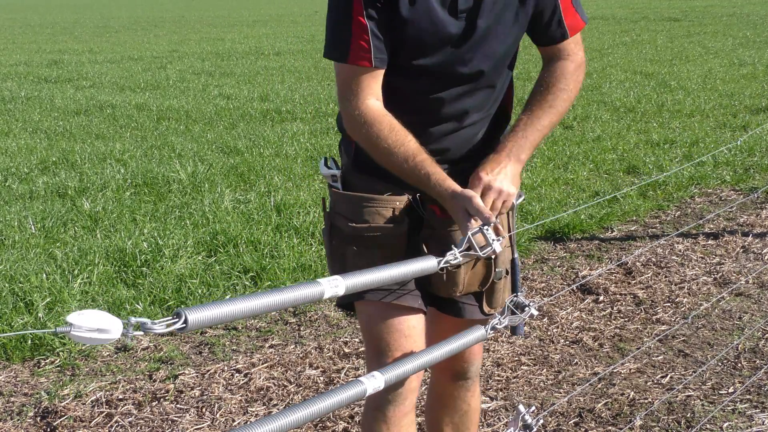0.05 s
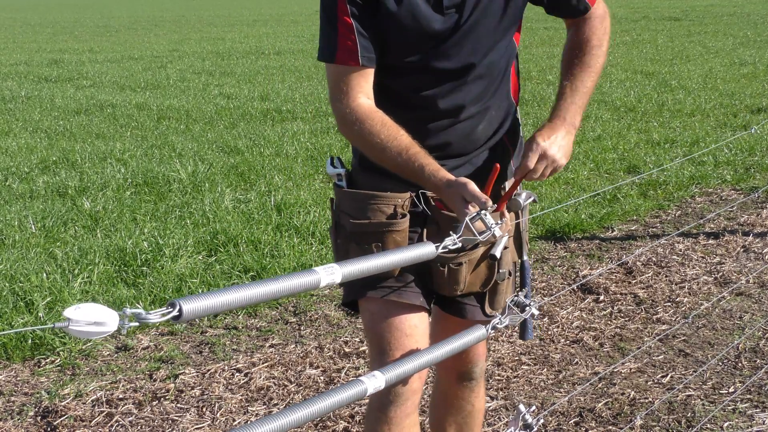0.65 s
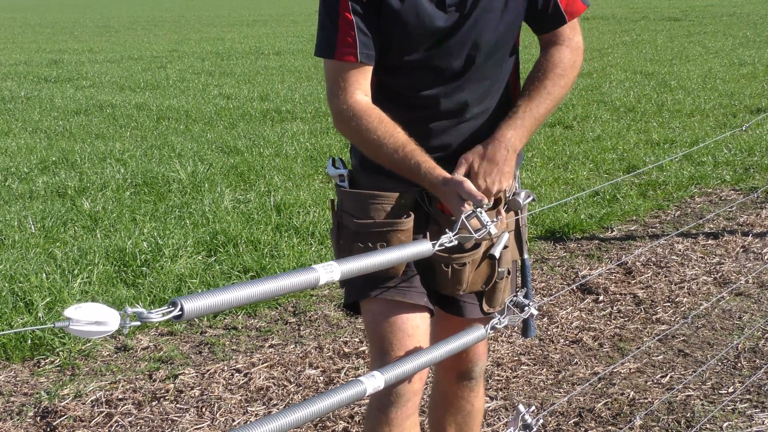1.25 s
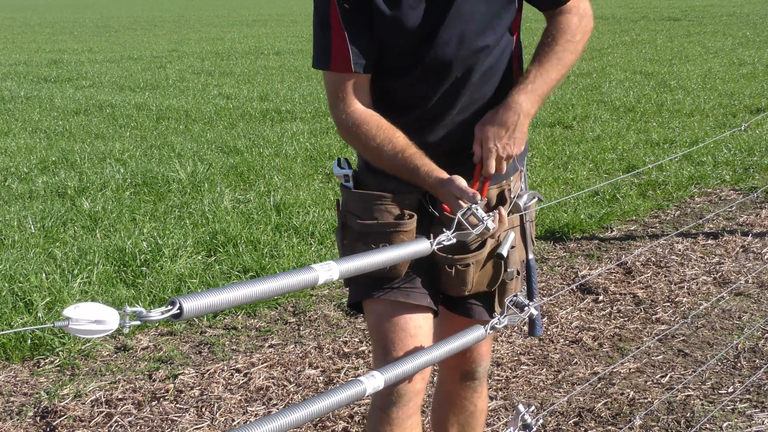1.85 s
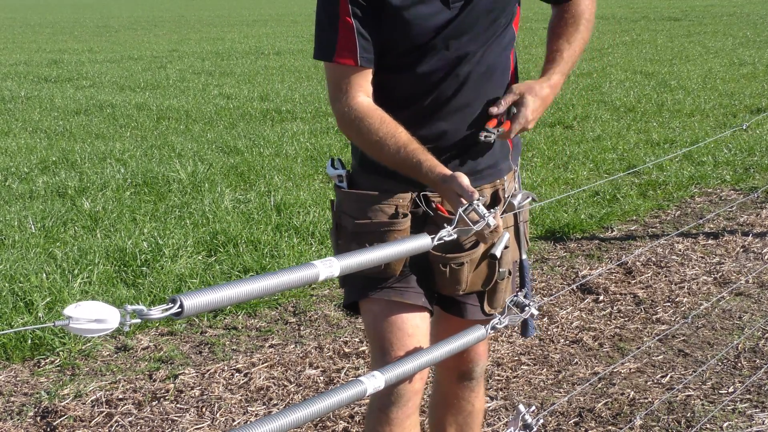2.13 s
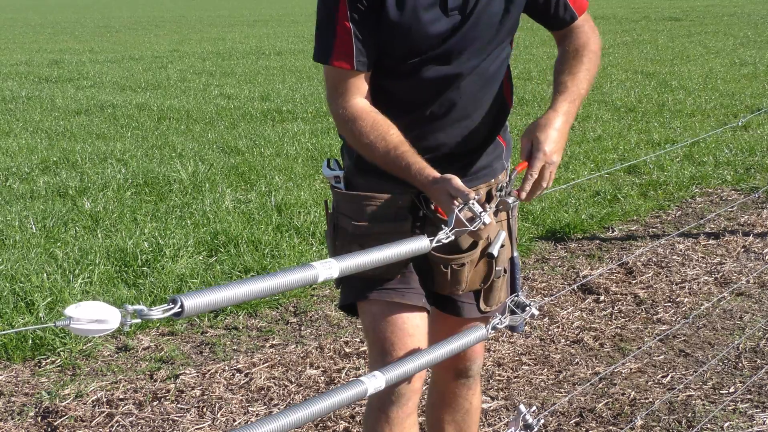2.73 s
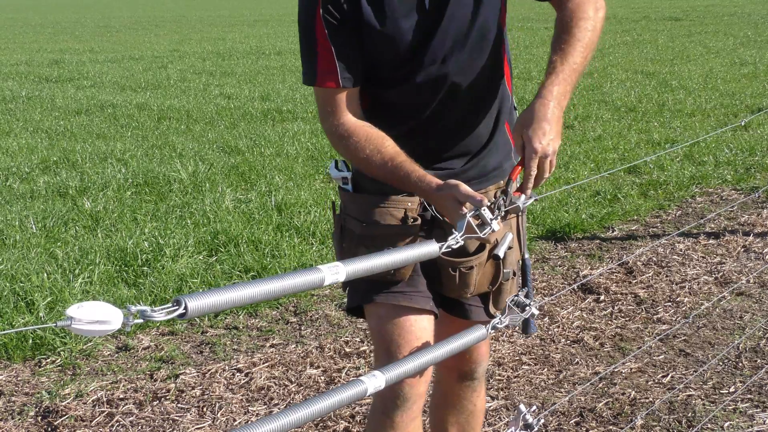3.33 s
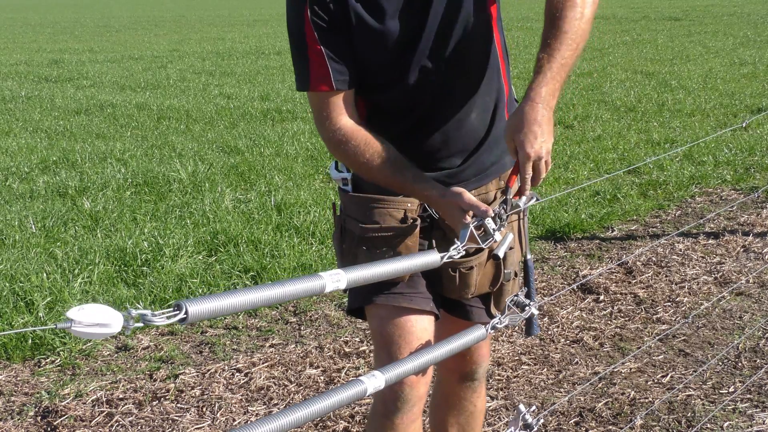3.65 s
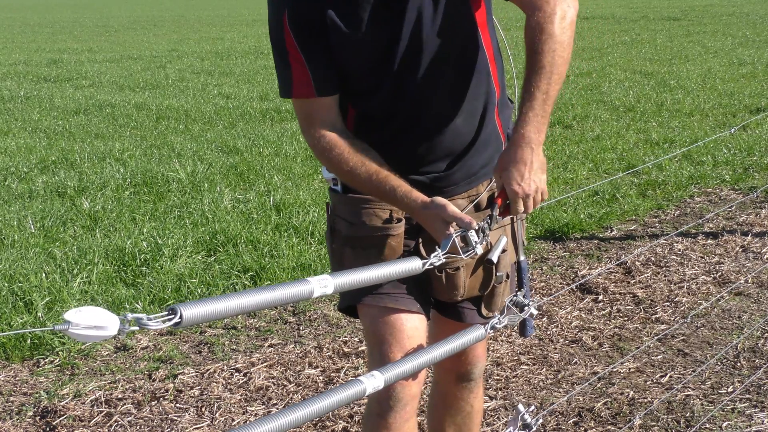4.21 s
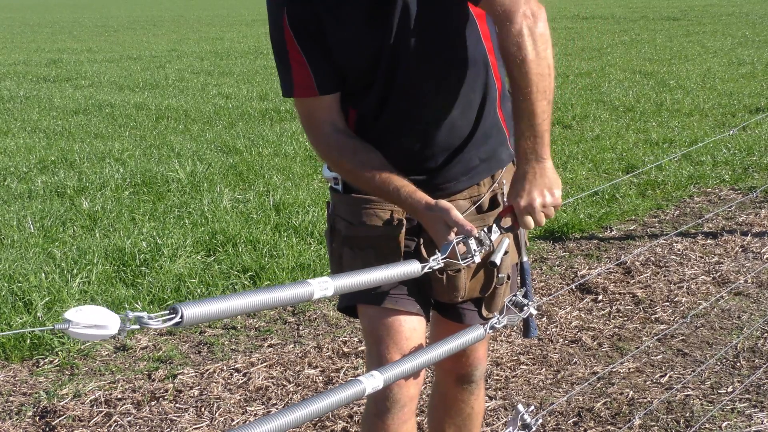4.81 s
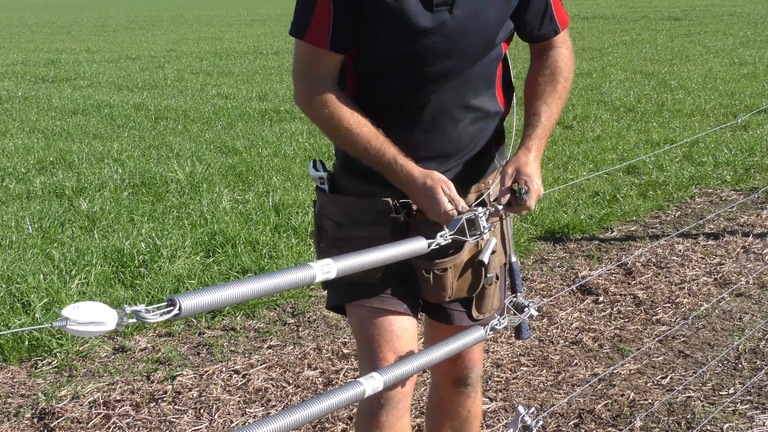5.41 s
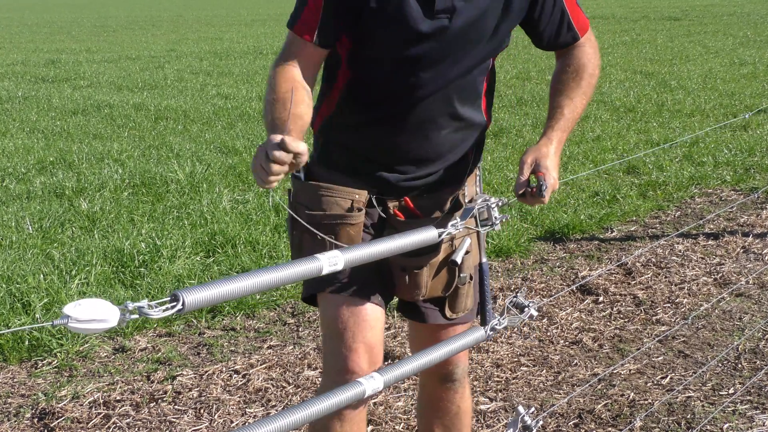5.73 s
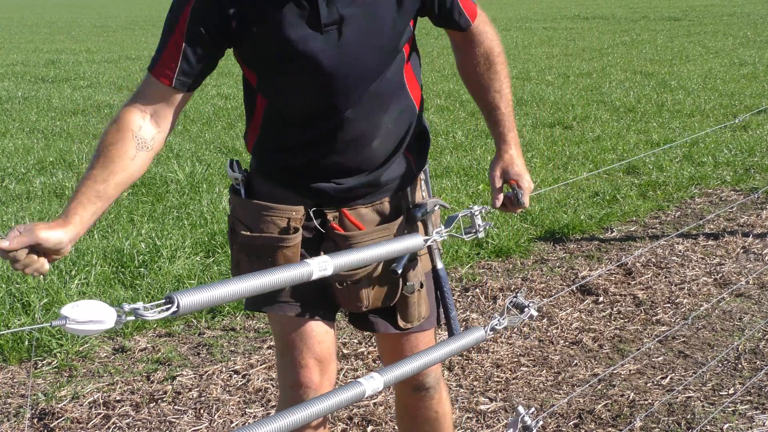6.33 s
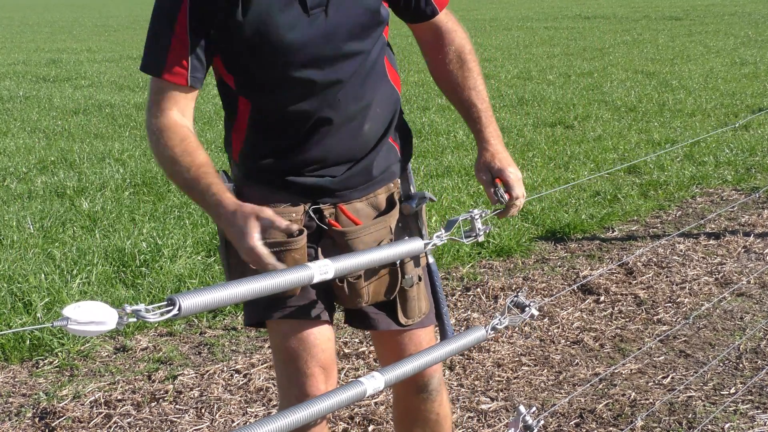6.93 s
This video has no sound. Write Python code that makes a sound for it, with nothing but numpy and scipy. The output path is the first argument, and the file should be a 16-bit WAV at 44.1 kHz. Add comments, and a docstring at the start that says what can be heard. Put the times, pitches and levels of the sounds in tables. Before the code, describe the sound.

Someone handles wire fittings outdoors with small clicks and dull thumps, then snips the wire with a sharp crack as a distant bird sings.

```python
"""Small ticks and knocks of pliers on fence fittings, a few steps from the microphone in an open paddock. A
hand rummages in a leather pouch and dull thumps come from the work at the strainer. Then the pliers bite
through the wire with one loud snap, the end springs free and is drawn out, and something drops into the pouch.
Each blow is a brief chatter of contacts ringing the thing struck; rubs and scrapes are uneven noise. Behind it
all a distant skylark whistles, over a low breeze and the hiss of open air."""
import sys
import numpy as np
from scipy import signal
from scipy.fft import rfft, irfft
from scipy.io import wavfile
from scipy.ndimage import uniform_filter1d

SR = 44100
rng = np.random.default_rng(int(sys.argv[2]) if len(sys.argv) > 2 else 0)


def unload_wav(signal):
    """Save mono or channel-first audio to the path in sys.argv[1] as 16-bit WAV at rate SR, clipped to [-1, 1]."""
    wavfile.write(
        sys.argv[1],
        SR,
        np.round(np.clip(np.atleast_2d(signal).T, -1, 1) * 32767).astype(np.int16),
    )


N = 311766

# The cut, a few steps ahead. Blows: (time [s], level [dB], tilt [dB/octave], chatter [s], t60 [s])
CUT_BLOWS = [(4.7658, -38, -0.5, .003, 0.014), (4.7687, -17.5, 3.5, 0.00052, 0.011),
             (4.7695, -12, 0.5, .0032, 0.014), (4.782, -35.5, -2, .004, 0.047),
             (4.7925, -40, -2.5, .002, 0.067), (4.808, -42.5, -0.5, .016, 0.084)]
# Its body. Every colour: (frequency [Hz], gain [dB]); all modes: (frequency [Hz], width [Hz], lift [dB])
CUT_COLOUR = [(71, -50.5), (120, -16.5), (378, -6), (1160, -13.5), (1750, -6.5), (2200, -14), (2530, -5),
              (3240, -8), (3590, -11), (4500, -6), (6910, -10), (7500, -12), (13000, -14), (16000, -19)]
CUT_MODES = [(384, 110, 8), (1330, 120, 5), (1778, 130, 10), (2455, 130, 9), (2600, 120, 5),
             (3608, 130, 10), (3928, 90, 4), (4230, 70, 4), (4423, 180, 7), (4615, 90, 4), (4839, 100, 5),
             (5772, 110, 4), (6515, 100, 5), (7555, 90, 10), (8141, 80, 6), (9463, 70, 7), (9592, 55, 12),
             (9763, 60, 8), (10600, 70, 5), (12100, 90, 5)]
def wire_snap():
    """The jaws bite through the wire in one loud crack."""
    return blows(CUT_BLOWS, CUT_COLOUR, CUT_MODES, trail_db=-31, trail_t60=.33)


# The freed end at the strainer: blows, colour and modes, columns as for the cut
SPRING_BLOWS = [(5.4102, -31.5, 0.75, .003, 0.027), (5.4140, -30.5, 1, 0.00158, 0.019),
                (5.422, -40.5, -2.2, 0.0012, 0.041)]
WIRE_COLOUR = [(120, -26), (200, -14.5), (432, -4), (791, -15), (1040, -3.5), (1710, -16), (2420, -20),
               (2750, -19), (5520, -16.5), (8270, -8), (12400, -10), (14900, -10), (16000, -7)]
WIRE_MODES = [(430, 61, 12), (1020, 65, 5), (5950, 71, 8.7), (6900, 33, 4.2), (7700, 150, 15.6),
              (8260, 51, 18), (8858, 66, 7.1), (9800, 82, 17), (11600, 50, 12), (14400, 35, 8),
              (14874, 50, 11), (15135, 28, 14)]
def wire_spring():
    """The cut end springs free with a bright clink."""
    return blows(SPRING_BLOWS, WIRE_COLOUR, WIRE_MODES, trail_db=-16.5, trail_t60=.11)


# The leather tool pouch: blows, colour and modes, columns as for the cut
POUCH_BLOWS = [(6.9998, -27, 0, 0.0036, 0.027), (7.0035, -25.5, -0.5, 0.0035, 0.057),
               (7.0155, -35, 3.5, 0.0024, 0.088), (7.040, -38, 11, 0.012, 0.068),
               (7.0515, -38, 4.5, 0.0044, 0.053), (7.058, -30.5, 6, 0.017, 0.12)]
POUCH_COLOUR = [(71, -58), (120, -30), (402, -17), (712, -6.5), (988, -10), (1790, -12), (1980, -15.5),
                (2930, -17), (3380, -15), (4500, -19), (6770, -25.5), (13600, -30.5), (16000, -36)]
POUCH_MODES = [(640, 49, 5.4), (736, 83, 7.8), (1113, 36, 6.5), (1406, 61, 6.4), (1750, 65, 4.9),
               (4370, 260, 3.8)]
def pouch_drop():
    """Something drops into the leather pouch, with a softer onset than the snap."""
    return blows(POUCH_BLOWS, POUCH_COLOUR, POUCH_MODES, trail_db=-14.5, trail_t60=.2, rise_s=.00047)


# Hook, pliers and clamp at the strainer: blows, colour and modes of each, columns as for the cut
HOOK_BLOWS = [(.4775, -38, 0.52, 0.0022, .024), (.511, -51.5, -2, 0.0082, 0.046)]
HOOK_COLOUR = [(120, -40), (200, -5), (749, -3), (1980, -17), (2700, -5), (3690, -21), (4600, -3),
               (5040, -27), (6050, -22), (14600, -53), (16000, -56)]
HOOK_MODES = [(668, 19, 14), (2695, 57, 17), (3350, 63, 20), (4580, 190, 9.4)]
PLIERS_BLOWS = [(.578, -46.5, -1.7, 0.002, 0.027), (1.0498, -33.5, 0.19, 0.0034, .028),
                (1.067, -39, -1.2, 0.0099, 0.037), (1.096, -38.5, 1, 0.0092, 0.026)]
PLIERS_COLOUR = [(88, -49), (150, -10.5), (414, -2.5), (555, -21), (662, -2.5), (923, -10), (1660, -8.5),
                 (1900, -14), (2700, -2.5), (3040, -14.5), (4410, -3), (5050, -8), (16000, -32)]
PLIERS_MODES = [(433, 24, 17), (690, 63, 5.5), (1560, 150, 3.6), (2790, 28, 17.4), (3260, 37, 14),
                (3940, 65, 9.6), (4300, 44, 8.3), (4490, 77, 12), (5540, 80, 16), (7160, 60, 16)]
CLAMP_BLOWS = [(.5459, -32.5, 0, .0015, .035), (.590, -47, 2, .005, .05)]
CLAMP_COLOUR = [(120, -40), (200, -14), (548, -18), (851, -6), (1000, -14.5), (1840, -14), (2380, -11),
                (2960, -17.5), (4520, -21), (16000, -40)]
CLAMP_MODES = [(423, 9.5, 24), (860, 13, 13), (2380, 40, 22), (4510, 68, 20), (5960, 60, 19),
               (6643, 54, 9.5), (8100, 45, 17)]
def tool_clinks():
    """Metal strikes metal, and each piece rings with its own modes."""
    return (blows(HOOK_BLOWS, HOOK_COLOUR, HOOK_MODES, trail_db=-11, trail_t60=.14)
            + blows(PLIERS_BLOWS, PLIERS_COLOUR, PLIERS_MODES, trail_db=-10, trail_t60=.2)
            + blows(CLAMP_BLOWS, CLAMP_COLOUR, CLAMP_MODES, trail_db=-9, trail_t60=.1))


# Knocks at the fence: (time [s], level [dB], tilt [dB/octave], chatter [s]); their colour and modes
KNOCKS = [(.676, -54.5, 2.5, .003), (1.212, -57.5, 3, 0.002), (1.524, -56, -1.5, .005),
          (1.435, -58, -9, .004), (1.572, -60, -1.5, .004), (1.624, -58, -4.5, 0.0035),
          (1.657, -61, -2.5, .003), (2.46, -58, -13, .008), (2.923, -50, 5, 0.0016),
          (3.9668, -41.5, 4, 0.0026), (3.9861, -39.5, 3, 0.00067), (4.001, -46, .5, .003),
          (5.153, -54.5, 2.5, .004), (5.361, -59, -6, 0.0054), (6.524, -54, -7, .006)]
KNOCK_COLOUR = [(88, -42), (150, -17), (422, -3), (589, -6), (1210, -4.5), (1660, -9), (1790, -7.5),
                (2920, -20), (4160, -20.5), (14800, -37.5), (16000, -47)]
KNOCK_MODES = [(463, 39, 11), (990, 120, 2.8), (1820, 46, 2.7), (4160, 160, 1.8), (7950, 140, 7.9),
               (8200, 130, 5.7)]
def knocks(t60=.035):
    """Tools and fittings knock lightly, all dying away at the same speed."""
    return blows([(*row, t60) for row in KNOCKS], KNOCK_COLOUR, KNOCK_MODES, trail_db=-8, trail_t60=.11)


# The clearer ticks: (time [s], relative level [dB], tilt [dB/octave]); their colour and modes
TICKS = [(0.012, -39, -0.5), (.183, -50, 1.5), (0.204, -42.5, -1), (0.3144, -36, 1), (.41, -47.5, -1),
         (.3484, -49.5, -4.5), (.488, -43, -4), (0.5836, -40.5, 2), (.632, -43.5, .5), (.819, -40.5, 0.5),
         (.877, -44.5, -2), (1.0116, -45.5, -1.5), (1.1194, -42.5, 2), (1.3449, -46.5, -1),
         (1.6536, -48.5, -2), (1.695, -49, -1.5), (1.7773, -47.5, -1), (2.0185, -50, -3.5),
         (2.1714, -47, 0.5), (2.361, -48, -2), (2.749, -50.5, 0.5), (2.6092, -47, 0), (2.842, -48.5, 0),
         (2.9233, -41, -5), (3.1452, -43.5, -0.5), (3.4194, -46, -1), (3.6535, -46, 1.5), (3.6875, -48, 1),
         (4.12, -46.5, -2), (4.228, -45, 0), (4.253, -43, 0), (4.358, -45.5, 0), (4.431, -45.5, .5),
         (4.8635, -36, .5), (4.8894, -42.5, 2), (4.9713, -43, -1.5), (5.0684, -42.5, -2), (5.363, -45, 2),
         (5.798, -46.5, -5.5)]
TICK_COLOUR = [(300, -45.5), (1000, -8), (2200, -0.5), (4000, 5), (5800, 5.5), (9000, -2.5), (12000, -1),
               (16000, 2)]
TICK_MODES = [(2243, 24, 8.6), (3970, 19, 7.8), (4370, 60, 3.1), (5870, 36, 9.8), (6270, 52, 5.7),
              (7730, 36, 12), (8500, 104, 10.3), (9080, 70, 6.5), (10000, 100, 6.3), (11270, 150, 9.6),
              (14200, 77, 4.5), (15550, 62, 2.7)]
def ticks(gain_db=-9, faint_db=-52, let_go_s=5.5, chatter_s=.0055, faint_t60=.06, t60_per_db=.0022):
    """Wire and fittings tick, harder ones ringing longer; faint ones fall at random until the hands let go."""
    faint = [(s, faint_db, -1) for s in rng.uniform(0, let_go_s, 9)]
    rows = [(s, db, tilt, chatter_s, faint_t60 + t60_per_db * (db - faint_db))
            for s, db, tilt in TICKS + faint]
    ticking = blows(rows, TICK_COLOUR, TICK_MODES, trail_db=-10, trail_t60=.2, rise_s=.0012, uneven_db=3)
    return gain_of(gain_db) * ticking


def blows(rows, colour, modes, trail_db, trail_t60, rise_s=.0001, uneven_db=0, size=16384):
    """Each blow chatters briefly and rings its body; a faint unpitched rustle trails it."""
    t, hz, out = np.arange(size) / SR, np.fft.rfftfreq(size, 1 / SR), np.zeros(N)
    octaves = np.log2(np.maximum(hz, 200) / 2000)
    for s, db, tilt, chatter_s, t60 in rows:
        # the point of contact decides which modes ring most
        struck = [(f, width, lift + uneven_db * rng.standard_normal()) for f, width, lift in modes]
        contact = gain_of(-60 * np.maximum(t - chatter_s, 0) / t60) * (1 - np.exp(-t / rise_s))
        ring = coloured(chatter(contact), body_db(colour, struck, hz) + tilt * octaves)
        rustle = rng.standard_normal(size) * 1000 ** (-t / trail_t60) * (1 - np.exp(-t / .003))
        trail = gain_of(trail_db) * coloured(rustle, read(colour, hz) + tilt * octaves)
        add(out, s, gain_of(db) * (ring + trail) * np.sqrt(SR / 100))  # level as rms over 10 ms
    return out


def chatter(envelope, passes=3):
    """A spray of tiny contacts that follows the envelope and holds all frequencies evenly."""
    spray = envelope * rng.standard_normal(len(envelope))
    for _ in range(passes):
        flat = irfft(np.exp(1j * np.angle(rfft(spray))))
        spray = flat * envelope / np.sqrt(abs(uniform_filter1d(flat ** 2, size=64)) + 1e-18)
    return spray


# Dull thumps, just left of centre: (time [s], peak [dB], pitch [Hz])
THUMPS = [(.56, -30.5, 89), (.591, -37, 115), (1.761, -46.5, 110), (3.2376, -27.5, 76), (3.3636, -30, 75),
          (3.5565, -29.5, 71.3), (3.854, -40, 82.5), (4.681, -41, 90)]
def thumps(fade_cycles=.62):
    """Soft low pushes of a cycle or two, with no ring."""
    t, out = np.arange(-SR // 10, SR // 10) / SR, np.zeros(N)
    for s, db, hz in THUMPS:
        swell = np.exp(-(t * hz / fade_cycles) ** 2)
        add(out, s + t[0], gain_of(db) * swell * np.cos(2 * np.pi * hz * t))
    return out


# Hand and cloth at the fence: (middle [s], length [s], level [dB], centre [Hz], width [octaves])
RUBS = [(.58, .07, -54.5, 190, .22), (1.539, .12, -66, 7800, 0.16), (1.803, 0.18, -72.5, 1370, .12),
        (2.573, .24, -73, 1650, .3), (3.128, .07, -63, 370, 0.4), (3.818, 0.092, -63, 1030, 0.98),
        (4.259, .24, -68.5, 1880, .47), (4.888, 0.2, -64, 2170, 1)]
def rubbing(grain_db=4, slips_per_s=130):
    """Short strokes of friction catch and slip; leather also shifts with every thump."""
    out = np.zeros(N)
    leather_shifts = [(s, .046, db - 35, 470, .52) for s, db, _ in THUMPS]  # columns as in RUBS
    for s, length, db, centre_hz, width in RUBS + leather_shifts:
        n = int(length * SR)
        octaves = np.log2((np.fft.rfftfreq(n, 1 / SR) + 1) / centre_hz)
        slips = rng.standard_normal(n) * gain_of(grain_db * drift(n, slips_per_s))
        stroke = irfft(rfft(slips) * np.exp(-.5 * (octaves / width) ** 2), n)
        add(out, s - length / 2, gain_of(db) * unit_rms(stroke) * np.sin(np.linspace(0, np.pi, n)))
    return out


# Inside the pouch: (time [s], level [dB]); the leather's colour and modes
RUMMAGE_LEVELS = [(.92, -72), (1.02, -64.5), (1.1, -55), (1.18, -65), (1.226, -50), (1.26, -64),
                  (1.38, -70), (1.44, -56), (1.5, -65.5), (1.7, -67), (2.0, -79)]
LEATHER_COLOUR = [(100, -35), (250, -3.5), (420, -1), (560, -7), (800, -3.5), (1100, -20), (2000, -23),
                  (6000, -40)]
LEATHER_MODES = [(297, 36, 7.8), (715, 58, 8.4)]
def rummaging():
    """Fingers and tools drag unevenly over the hollow leather pouch."""
    return friction(RUMMAGE_LEVELS, LEATHER_COLOUR, LEATHER_MODES, grain_db=4, slips_per_s=110)


# The wire drawn out: (time [s], level [dB]); the colour and modes it sings with
DRAW_LEVELS = [(5.41, -72), (5.43, -57.5), (5.52, -58.5), (5.62, -60.5), (5.74, -61), (5.81, -59.5),
               (5.9, -59.5), (5.951, -74)]
DRAW_COLOUR = [(150, -7.5), (450, 3.5), (800, -2.5), (2500, -3.5), (3400, -9), (4400, -7), (6000, -17.5),
               (15000, -25)]
DRAW_MODES = [(1130, 40, 5.2), (1860, 37, 5), (2065, 35, 9.9), (2480, 48.7, 5.7), (2630, 32, 8.9)]
def drawn_wire():
    """The loose end slides through the clamp and sings faintly."""
    return friction(DRAW_LEVELS, DRAW_COLOUR, DRAW_MODES, grain_db=2, slips_per_s=90)


def friction(levels, colour, modes, grain_db, slips_per_s):
    """Sliding contact: noise through a body, its level roughened by tiny slips."""
    level_db = np.interp(np.arange(N) / SR, *np.transpose(levels), left=-140, right=-140)
    return gain_of(level_db + grain_db * drift(N, slips_per_s)) * noise(colour, modes)


# The wire working loose: (middle [s], length [s], level [dB]); its colour
SCRAPES = [(5.282, 0.044, -57), (5.378, 0.076, -57)]
SCRAPE_COLOUR = [(200, -18), (750, 1), (1400, -10.5), (3000, -17), (6000, -19.5), (8500, -11), (12000, -20),
                 (16000, -30)]
def scraping(grain_db=3, slips_per_s=130):
    """The cut wire shifts in the clamp with a dull rasp and a thin hiss."""
    level = np.zeros(N)
    for s, length, db in SCRAPES:
        add(level, s - length / 2, gain_of(db) * np.sin(np.linspace(0, np.pi, int(length * SR))))
    return level * gain_of(grain_db * drift(N, slips_per_s)) * noise(SCRAPE_COLOUR)


# Reflections off the ground and nearby things: (delay [s], gain [dB])
ECHOES = [(.0034, -18.5), (.0053, -25), (0.0135, -27.5)]
def echoed(direct):
    """The direct sound reaches the microphone just ahead of its first reflections."""
    out = direct.copy()
    for delay, db in ECHOES:
        add(out, delay, gain_of(db) * direct)
    return out


# The skylark, far overhead. Slurs: (time [s], length [s], start [Hz], end [Hz], level [dB], warble [Hz])
LARK_SLURS = [(.117, 0.026, 4900, 3980, -62.5, 200), (0.694, 0.15, 4500, 3370, -64.5, 92),
              (1.152, .07, 4100, 3200, -64, 120), (1.523, 0.045, 4630, 3430, -56.5, 120),
              (1.692, 0.011, 4720, 3670, -54, 0), (1.728, 0.016, 3800, 3000, -54.5, 0),
              (1.798, 0.086, 4700, 3430, -58.5, 258), (1.995, .04, 5300, 4000, -58, 150),
              (2.33, 0.082, 5100, 4050, -60.5, 172), (2.427, 0.018, 3570, 4700, -53, 0),
              (2.444, .09, 4650, 4000, -68, 0), (2.748, 0.019, 4930, 4400, -53.5, 0),
              (3.07, 0.064, 5100, 3620, -58, 0), (3.351, .05, 4750, 3700, -57.5, 0),
              (3.867, 0.065, 5000, 4070, -54.5, 20), (4.619, .023, 4000, 4550, -52.5, 0),
              (4.714, 0.0091, 3900, 4770, -53.5, -0.5), (4.74, .021, 3600, 3200, -58, 0.5),
              (5.108, .018, 3590, 4140, -55.5, 0), (5.206, .014, 5400, 3900, -52, 0),
              (5.239, 0.022, 5300, 3140, -54, 0), (5.342, 0.013, 5130, 3400, -55, 0.5),
              (5.458, .02, 5100, 3800, -53.5, 1), (5.81, .025, 4070, 4470, -59.5, 0),
              (6.455, .01, 5060, 4055, -52.5, 0), (6.496, .027, 5000, 3040, -61.5, 0),
              (6.67, 0.014, 4600, 3310, -58, 0)]
# Held, buzzing notes: (time [s], length [s], pitch [Hz], level [dB], warble [Hz])
LARK_BUZZES = [(0.893, .038, 4800, -61, 20), (2.554, 0.062, 2880, -60.5, 60), (2.934, 0.15, 4880, -64, 300),
               (3.202, 0.083, 4670, -52, 230), (3.272, 0.087, 4880, -60, 180),
               (4.03, 0.087, 4480, -62.5, 390), (4.47, 0.067, 4800, -58.5, 74),
               (5.541, .018, 4600, -52, 210), (5.656, 0.053, 4350, -56, 20)]
# Trills of falling chirps: (start [s], end [s], rate [1/s], top [Hz], level [dB])
LARK_TRILLS = [(1.942, 2.005, 46, 4700, -57.5), (2.09, 2.165, 68, 4700, -58.5),
               (2.205, 2.28, 66, 4690, -59.5), (2.772, 2.84, 58, 4120, -60), (3.475, 3.645, 41, 4110, -61),
               (4.275, 4.41, 56, 5500, -60.5), (5.324, 5.409, 45, 5940, -56.5),
               (5.97, 6.09, 58, 3700, -64.5), (6.717, 6.792, 70, 5080, -60.5)]
# Faint loose twitter: (start [s], end [s], middle [Hz])
LARK_TWITTER = [(.165, .26, 4400), (0.968, 1.01, 3970), (2.692, 2.74, 3600), (5.771, 5.95, 4400),
                (6.33, 6.44, 3800), (6.61, 6.665, 5200), (6.87, 6.92, 5300)]
def lark_song(sag=.012, lift=.019, arch=.026, trill_fall=.63, twitter_s=.018, twitter_per_s=26):
    """One bird whistles a run of slurs, buzzes, trills and loose twitter."""
    song = np.zeros(N)
    for s, length, start_hz, end_hz, db, warble_hz in LARK_SLURS:
        middle_hz = np.sqrt(start_hz * end_hz) * (1 - sag)
        add(song, s, whistle(length, start_hz, middle_hz, end_hz, db, warble_hz))
    for s, length, hz, db, warble_hz in LARK_BUZZES:
        add(song, s, whistle(length, hz * (1 - lift), hz * (1 + arch), hz * (1 + lift), db, warble_hz))
    for start, end, per_s, top_hz, db in LARK_TRILLS:
        for s in np.arange(start, end - .5 / per_s, 1 / per_s):
            uneven = 1 + .065 * rng.standard_normal(3)
            glide_hz = top_hz * trill_fall ** np.array([0, .5, 1]) * uneven
            add(song, s, whistle(.65 / per_s, *glide_hz, db))
    for start, end, hz in LARK_TWITTER:
        for s in np.arange(start, end - twitter_s, 1 / twitter_per_s):
            octaves = .12 * rng.standard_normal(3) + [.1, 0, -.1]  # random turns on a falling line
            add(song, s, whistle(twitter_s, *hz * 2 ** octaves, db=-64))
    return song


def skylark(gain_db=-2.5, flutter_db=3.7, scatter_db=-9, scatter_t60=.2):
    """The song comes from high above; the air makes it flutter and the paddock scatters it."""
    song = lark_song() * gain_of(gain_db + flutter_db * drift(N, 110))
    t = np.arange(SR // 4) / SR
    tail = rng.standard_normal(len(t)) * 1000 ** (-t / scatter_t60)
    return song + gain_of(scatter_db) * signal.oaconvolve(song, tail / np.linalg.norm(tail))[:N]


def whistle(length, start_hz, middle_hz, end_hz, db, warble_hz=0, warbles_per_s=79):
    """One pure note on a parabola through three pitches, with a fast warble warble_hz deep."""
    t = np.arange(int(length * SR)) / SR
    u = t / length
    hz = start_hz * (1 - u) * (1 - 2 * u) + middle_hz * 4 * u * (1 - u) + end_hz * u * (2 * u - 1)
    hz += warble_hz * np.sin(2 * np.pi * warbles_per_s * t)
    return gain_of(db) * np.sin(2 * np.pi * np.cumsum(hz) / SR) * np.sqrt(abs(np.sin(np.pi * u)))


def far_hum():
    """One faint, brief hum far off, sinking in pitch."""
    return whistle(length=.17, start_hz=362, middle_hz=354, end_hz=340, db=-61)


# Gusts at the microphone: (time [s], level [dB], fade [s]); the breeze's colour
GUSTS = [(.6, -56, .11), (3.27, -48, .18), (3.6, -54.5, .1), (4.69, -56.5, .08)]
BREEZE_COLOUR = [(8.8, -28), (15, 3.5), (43, -6), (86, -6.5), (102, -6), (135, -11.5), (157, -16),
                 (170, -20.5), (220, -45.5), (370, -120)]
def breeze(steady_db=-60.3, rise_s=.042):
    """A low, wavering rumble with a few gusts that rise fast and die away."""
    t = np.arange(N) / SR
    gusts = sum(gain_of(db) * np.exp(-np.maximum((s - t) / rise_s, (t - s) / fade))
                for s, db, fade in GUSTS)
    level = (gain_of(steady_db) + gusts) * gain_of(1.7 * drift(N, 11))
    return level * wide_noise(BREEZE_COLOUR, apart_db=-14)


# Open air all round the microphone: (frequency [Hz], gain [dB])
AIR_COLOUR = [(88, -33), (150, -1), (249, -3), (376, -5.5), (457, -9), (905, -13), (1260, -17),
              (2600, -17.5), (2810, -17), (4080, -16.5), (6260, -20.5), (15100, -23.5), (16000, -32)]
def air(level_db=-65.5):
    """The even hiss of the open paddock."""
    return gain_of(level_db + .37 * drift(N, 5)) * wide_noise(AIR_COLOUR, apart_db=-9)


def wide_noise(colour, apart_db):
    """Noise common to both sides, plus a weaker part of each side's own."""
    return noise(colour) + gain_of(apart_db) * np.array([noise(colour), noise(colour)])


def noise(colour, modes=()):
    """Steady noise of rms 1 through a body."""
    hz = np.fft.rfftfreq(N, 1 / SR)
    return unit_rms(irfft(rfft(rng.standard_normal(N)) * gain_of(body_db(colour, modes, hz)), N))


def coloured(x, gain_db):
    """Causal colouring, so that resonances ring after the blow; the result has energy 1."""
    log_gain = np.log(gain_of(gain_db))
    causal = np.conj(signal.hilbert(np.r_[log_gain, log_gain[-2:0:-1]]))[:len(log_gain)]
    sound = irfft(rfft(x) * np.exp(causal))
    return sound / np.linalg.norm(sound)


def body_db(colour, modes, hz):
    """A broad colour with resonance peaks standing on it."""
    peaks = sum(gain_of(db) ** 2 / (1 + (2 * (hz - f) / width) ** 2) for f, width, db in modes)
    return read(colour, hz) + 10 * np.log10(1 + peaks)


def read(colour, hz):
    """A colour's dB at any frequency."""
    f, db = np.transpose(colour)
    return np.interp(np.log(hz + 1), np.log(f + 1), db)


def drift(length, per_s):
    """A random wander of spread about 1."""
    return np.interp(np.arange(length) * per_s / SR, np.arange(4096), rng.standard_normal(4096))


def gain_of(db):
    """Decibels to a factor."""
    return 10 ** (np.asarray(db) / 20)


def unit_rms(x):
    """Scales to rms 1."""
    return x / np.sqrt(np.mean(x ** 2) + 1e-20)


def add(mix, s, sound):
    """Lays a sound into the mix at time s."""
    part = mix[max(round(s * SR), 0):][:len(sound)]
    part += sound[:len(part)]


def leftward(x, db):
    """Raises the left channel and lowers the right by db."""
    return x * gain_of([[db], [-db]])


def scene():
    """The microphone faces the strainer; the breeze is a little stronger on the left."""
    strikes = wire_snap() + wire_spring() + pouch_drop() + tool_clinks() + knocks() + ticks()
    handling = rubbing() + rummaging() + scraping() + drawn_wire()
    ahead = echoed(strikes + handling) + skylark()
    add(ahead, 2.27, far_hum())
    return leftward(ahead, .15) + leftward(thumps(), .8) + leftward(breeze(), 1.3) + leftward(air(), .3)


def record(dry, ceiling=.85, edge_hz=15900):
    """The snap overloads the microphone input for an instant; then the top treble is cut off."""
    lowpass = signal.firwin(401, edge_hz, window=("kaiser", 9), fs=SR)
    return signal.oaconvolve(np.clip(dry, -ceiling, ceiling), lowpass[None], "same")


dry = scene()
out = record(dry)
unload_wav(out)
```